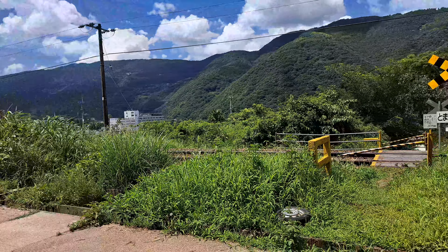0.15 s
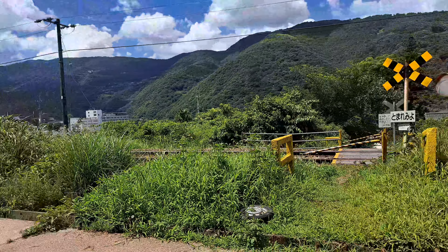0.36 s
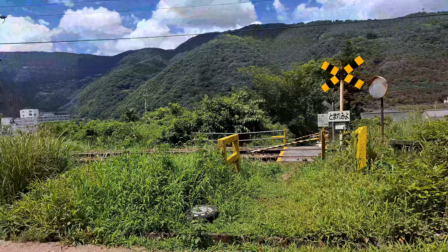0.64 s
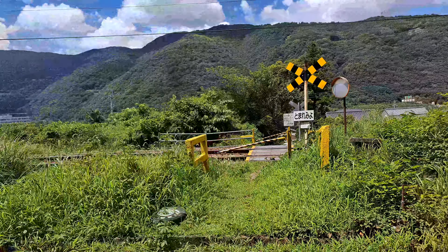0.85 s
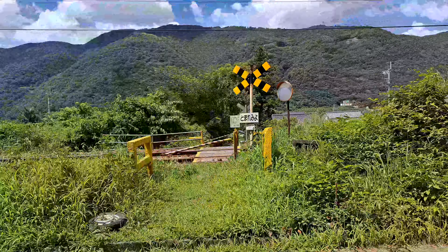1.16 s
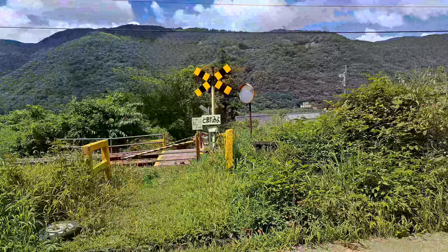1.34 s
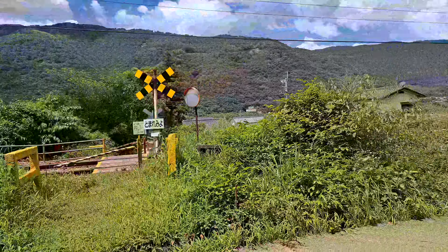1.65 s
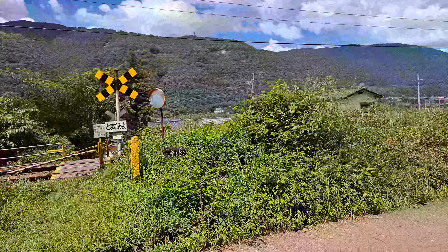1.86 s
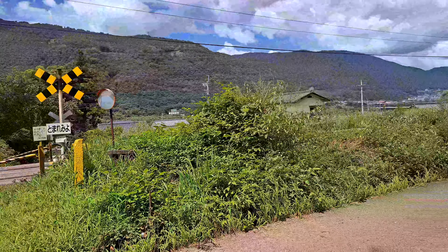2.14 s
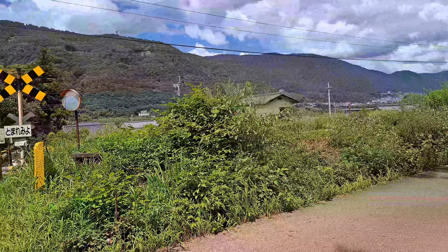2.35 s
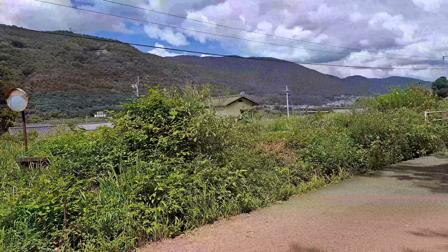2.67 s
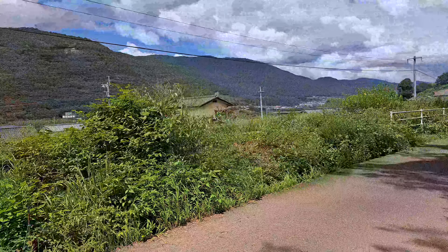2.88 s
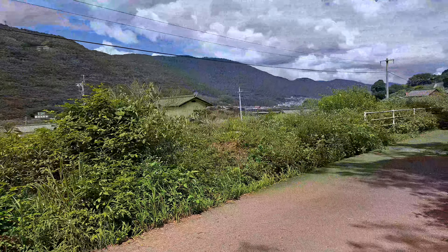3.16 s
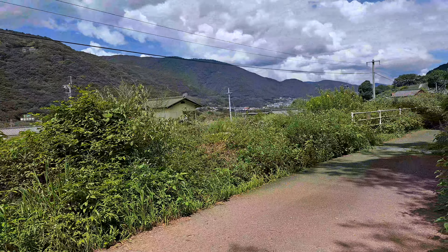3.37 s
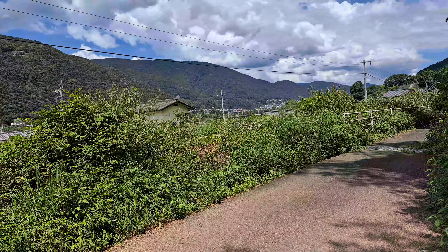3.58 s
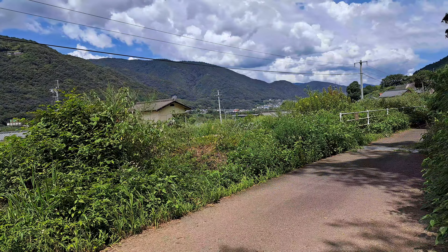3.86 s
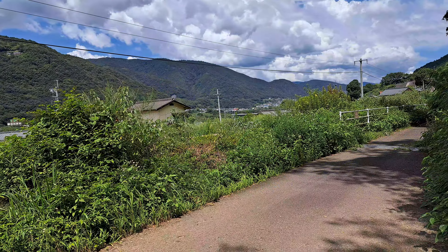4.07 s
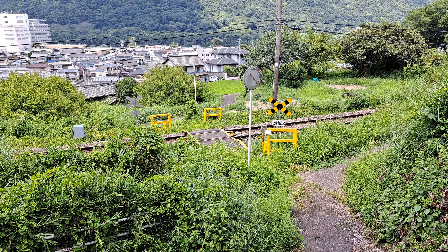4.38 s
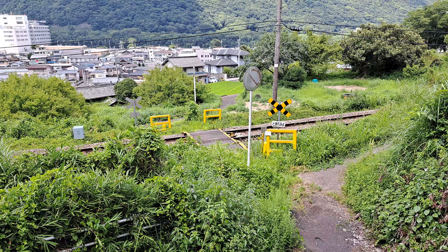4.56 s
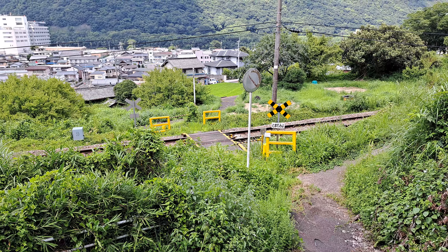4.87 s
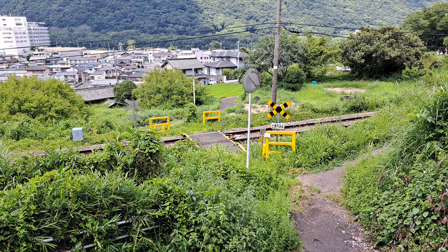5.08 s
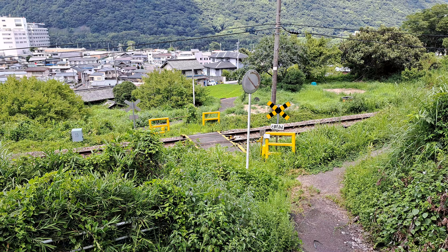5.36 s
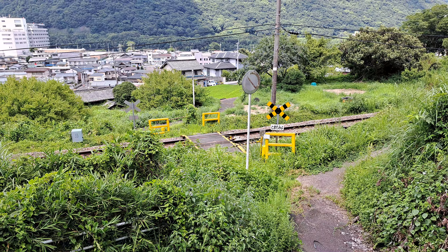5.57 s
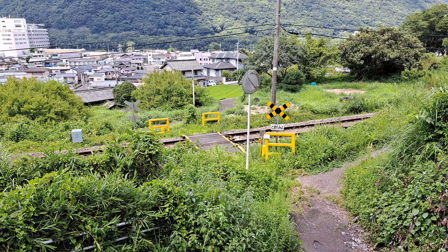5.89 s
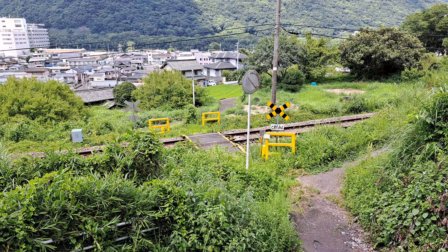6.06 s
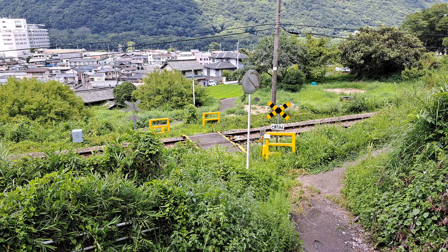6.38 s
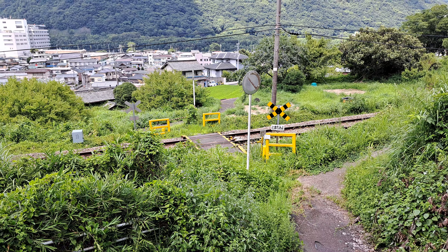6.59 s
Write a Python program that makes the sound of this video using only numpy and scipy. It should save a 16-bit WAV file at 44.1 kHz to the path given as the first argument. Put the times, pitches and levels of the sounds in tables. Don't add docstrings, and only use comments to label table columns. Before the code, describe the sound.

Loud close cicadas shrill on a summer lane with wind thumping the right microphone, then cut to a quieter, farther chorus over low town hum.

```python
import sys
import numpy as np
from scipy import signal
from scipy.fft import rfft, irfft, next_fast_len
from scipy.io import wavfile

SR = 44100
rng = np.random.default_rng(int(sys.argv[2]) if len(sys.argv) > 2 else 0)


def voltage_ratio(decibels):
    exponent = np.asarray(decibels, float) / 20
    return 10 ** exponent


def persist_wave(psi):
    counts = np.round(np.clip(psi, -1, 1) * 32767).astype(np.int16)
    wavfile.write(sys.argv[1], SR, np.atleast_2d(counts).T)


N = 296793
T = np.arange(N) / SR
PADDED = next_fast_len(N)
HZ = np.fft.rfftfreq(PADDED, 1 / SR) + 1e-3
TOP_HZ = 15740
CUT_S, RESUME_S = 4.2023, 4.2355


def rms_one(x):
    return x / np.sqrt(np.mean(x ** 2, axis=-1, keepdims=True) + 1e-20)


def left_right(left_db, right_db):
    return voltage_ratio(np.array([[left_db], [right_db]]))


def in_time(rows):
    s, *columns = np.transpose(rows)
    return [np.interp(T, s, c) for c in columns]


def at_hz(points):
    hz, values = np.transpose(points)
    return np.interp(np.log(HZ), np.log(hz), values)


def shaped(x, gain):
    return irfft(rfft(x, PADDED) * gain, PADDED)[..., :N]


def below(edge_hz, order=6):
    return 1 / np.sqrt(1 + (HZ / edge_hz) ** (2 * order))


def above(edge_hz, order=6):
    return 1 - below(edge_hz, order) ** 2


def drift(rate_hz, count=2):
    steps = next_fast_len(N // 32 + 2)
    hz = np.fft.rfftfreq(steps, 32 / SR)
    slowness = (hz > .2) / (1 + (hz / rate_hz) ** 2)
    slow = rms_one(irfft(rfft(rng.standard_normal((count, steps))) * slowness, steps))
    return np.array([np.interp(np.arange(N) / 32, np.arange(steps), row) for row in slow])


def two_ears(mid_db, pan_db):
    return 2 * voltage_ratio(mid_db) / np.sqrt(1 + voltage_ratio(2 * pan_db * np.array([[-1], [1]])))


def whistle(hz, level_db, width_hz):
    breath = rms_one(shaped(rng.standard_normal((2, N)), below(width_hz, order=2)))
    return voltage_ratio(level_db) * breath * np.sin(2 * np.pi * np.cumsum(hz) / SR)


def tymbals(rate_hz, spread, wander, count=4):
    out = np.zeros((2, N))
    strengths = voltage_ratio(2 * rng.standard_normal(N))
    for own, slow in zip(rng.standard_normal(2 * count), drift(6, count=2 * count)):
        beat = np.cumsum(rate_hz * (1 + spread * own + wander * slow)) / SR
        clicks = np.diff(np.floor(beat), prepend=0)
        out[int(rng.integers(2))] += clicks * np.roll(strengths, int(rng.integers(N)))
    return rms_one(out)


# frequency in Hz, left minus right in dB.
EAR_TILT = [(2400, -5), (4400, -3.5), (5600, -6), (6800, 2), (8000, -1), (8800, 10), (10700, 4),
            (13000, 2.5), (15500, 3)]
SPLITS_HZ = [3500, 6900, 10300]


def chorus(levels, voices, song, near_body, near_shrill, patchy_db):
    level_db, facing_db = in_time(levels)
    mean_db = np.mean(levels, axis=0)[1]
    tilt_db = at_hz(EAR_TILT) / 2 * np.array([[1], [-1]])
    colour = voltage_ratio(at_hz(song) + tilt_db) * above(1100) * below(TOP_HZ)
    low, mid, high = (below(edge, order=12) for edge in SPLITS_HZ)
    bands = [low, mid * np.sqrt(1 - low ** 2), high * np.sqrt(1 - mid ** 2), np.sqrt(1 - high ** 2)]
    nears = [0, near_body * tymbals(395, .03, .01), near_shrill * tymbals(503, .004, .011), 0]
    far = rng.standard_normal((2, N))
    shared_swell = drift(7)
    out = np.zeros((2, N))
    for band, near, (db, swells, pan_db, turns) in zip(bands, nears, voices):
        gain = two_ears(mean_db + db + swells * (level_db - mean_db), pan_db + turns * facing_db)
        patchy = voltage_ratio(patchy_db * (shared_swell + 0.73 * drift(17) + 0.82 * drift(1.1)))
        out += gain * patchy * rms_one(shaped(far + near, colour * band))
    return out


# time in seconds, level in dB, left minus right in dB.
LANE = [(0.05, -19.5, -6.5), (0.2, -19, -6), (1.33, -20, -6.5), (2.0, -21.5, -6), (2.5, -22, -4),
        (3.3, -22, -4.5), (4.15, -21.5, -6)]
# level in dB against the chorus, share of its swell followed,
# left minus right in dB against the chorus, share of its turning followed.
LANE_VOICES = [
    (-32.5, 2.24, -8, .01),
    (-5.5, .9, -2, 1.07),
    (-3, 0.96, 1.8, 1.05),
    (-8.5, 0.84, 0.1, .1),
]
# frequency in Hz, strength in dB per Hz.
LANE_SONG = [(1000, -53), (1700, -43.5), (2010, -31.5), (2680, -21.5), (3140, -32.5), (3810, -31.5),
             (4550, -11), (5580, -1.5), (7040, -8), (7800, -2.5), (8240, 1), (10600, -19.5), (14700, -9.5),
             (15600, -12.5)]


def lane_chorus():
    return chorus(LANE, LANE_VOICES, LANE_SONG, near_body=.8, near_shrill=1.6, patchy_db=.6)


def gusts(rows):
    start, hold, thump_db, flutter_db = np.transpose(rows)[:, :, None]
    s = T[::64]
    rise_db = -600 * np.maximum(start - s, 0)
    fall_db = -335 * np.maximum(s - start - hold, 0)
    shape_db = rise_db + fall_db
    return [2 * np.interp(T, s, voltage_ratio(np.max(db + shape_db, axis=0))) for db in (thump_db, flutter_db)]


# start in seconds, hold in seconds, thump in dB, flutter in dB.
GUSTS = [(-.01, 0.016, -36, -62), (0.298, 0.059, -50, -61), (0.406, 0.041, -41.5, -60),
         (1.047, 0.03, -47.5, -66), (1.287, .06, -31.5, -37.5), (1.345, 0.043, -26, -31.5),
         (1.41, 0.067, -21, -21), (1.5, 0.034, -40, -25), (1.568, 0.067, -40, -45),
         (1.701, .08, -39, -50.5), (1.953, 0.061, -38.5, -45.5), (2.015, 0.041, -33.5, -40),
         (2.147, 0.035, -32, -43), (2.229, 0.017, -25.5, -53), (2.342, 0.038, -33.5, -46),
         (2.382, 0.031, -25, -29.5), (2.447, 0.14, -37.5, -45.5), (2.95, 0.017, -47, -69),
         (3.027, 0.015, -37, -58), (3.11, 0.043, -38, -58), (3.259, 0.017, -39.5, -63),
         (3.54, .06, -53, -62), (3.77, 0.013, -50.5, -66), (3.94, 0.14, -43, -57), (4.174, .03, -62, -58)]
# start in seconds, hold in seconds, thump in dB, flutter in dB.
LEE_GUSTS = [(.08, 0.11, -62, -68), (.28, 0.29, -49, -63), (.52, 0.04, -51, -66), (1.03, .04, -52, -69),
             (1.18, .06, -54, -70), (1.56, .07, -51, -63), (2.0, .05, -67, -72), (2.4, .1, -61, -74),
             (2.9, 0.045, -64, -68), (3.1, 0.17, -59, -68), (3.5, 0.26, -57, -66)]


def wind():
    thumps, flutters = np.swapaxes([gusts(LEE_GUSTS), gusts(GUSTS)], 0, 1)
    breeze = voltage_ratio(-67.5 + 2.5 * drift(2.0))
    eddies = rng.standard_normal((2, 2, N)) * voltage_ratio(4.1 * drift(28))
    thump = rms_one(shaped(eddies[0], below(51.5, order=3) * above(45, order=3)))
    flutter = rms_one(shaped(eddies[1], below(115.5, order=4) * above(95, order=3)))
    blown = (breeze + thumps) * thump + (voltage_ratio(-18) * breeze + flutters) * flutter
    return shaped(blown, below(340, order=4))


# frequency in Hz, left-right likeness from 0 to 1.
LIKENESS = [(60, 1), (130, 0.87), (290, 0.87), (640, .4), (1400, .01)]


def open_air(share):
    mid, side = rng.standard_normal((2, N))
    alike = np.clip(share * at_hz(LIKENESS), 0, 1)
    return shaped(mid, np.sqrt(1 + alike)) + shaped(side, np.sqrt(1 - alike)) * [[1], [-1]]


def patchy_air(noise, spectrum, band, patchy_db):
    return rms_one(shaped(noise, voltage_ratio(at_hz(spectrum)) * band)) * voltage_ratio(patchy_db * drift(13.5, count=1))


# frequency in Hz, strength in dB per Hz.
LANE_AIR = [(18, -31), (30, 5.5), (69, 0.5), (191, -16), (310, -16.5), (735, -20), (804, -21), (1030, -20),
            (1350, -25.5), (1840, -28), (2200, -17.5), (2860, -37), (4840, -120)]


def lane_air():
    band = below(2200) * above(28, order=2) * (1 - .55 * below(125))
    rush = patchy_air(open_air(.4), LANE_AIR, band, patchy_db=1.6)
    return rush * left_right(-59 + 2.2, -59 + 3.2)


# time in seconds, throbs per second, level in dB.
KATYDID = [(0, 16.2, -33), (1.5, 16.4, -35), (2.8, 16.0, -33), (4.19, 16.2, -30), (4.25, 16.5, -45),
           (5.2, 16.8, -43), (5.8, 17.3, -37), (6.73, 17.4, -37)]


def katydid():
    rate, level_db = in_time(KATYDID)
    stroke = np.maximum(np.sin(2 * np.pi * np.cumsum(rate) / SR + 1.2), 0) ** 2
    band = above(13600, order=10) * below(TOP_HZ, order=100)
    rasp = rms_one(shaped(rng.standard_normal((2, N)), band))
    return voltage_ratio(level_db) * stroke * rasp * left_right(-5.5, 1.5)


# time in seconds, pitch in Hz, level in dB.
THIN = [
    (0, 6560, -60),
    (2.5, 6550, -50),
    (2.9, 6540, -38),
    (3.7, 6540, -38),
    (4.19, 6540, -44),
]


def thin_singer():
    return whistle(*in_time(THIN), width_hz=30) * left_right(-9.5, 3.5)


# time in seconds, pitch in Hz, level in dB.
COO = [
    (.74, 1080, -81),
    (.8, 1150, -57),
    (.86, 1100, -60),
    (.93, 1050, -85),
]


def far_coo():
    return whistle(*in_time(COO), width_hz=87) * left_right(-9.5, 3.5)


def lane():
    return lane_chorus() + wind() + lane_air() + thin_singer() + far_coo()


# time in seconds, level in dB, left minus right in dB.
SLOPE = [(4.3, -36, -4.5), (4.7, -36.5, -4), (5.15, -37, -4), (5.5, -33.5, -5.5), (5.92, -31, -4),
         (6.3, -29.5, -4.5), (6.68, -30, -4.5)]
# level in dB against the chorus, share of its swell followed,
# left minus right in dB against the chorus, share of its turning followed.
SLOPE_VOICES = [
    (-25, 0.49, -11.5, .01),
    (-2, 0.79, -4.5, 0.99),
    (-1.5, 0.83, 1, .9),
    (-6.5, 0.7, -2.5, .1),
]
# frequency in Hz, strength in dB per Hz.
SLOPE_SONG = [(1000, -52), (1700, -28), (2510, -20.5), (2730, -20.5), (3230, -26.5), (3640, -28.5),
              (4110, -22), (4680, -9), (5480, -1), (6420, -2), (7310, -0.5), (8170, 1), (10000, -15.5),
              (14800, -6), (15600, -6.5)]


def slope_chorus():
    return chorus(SLOPE, SLOPE_VOICES, SLOPE_SONG, near_body=.75, near_shrill=.6, patchy_db=.4)


# frequency in Hz, strength in dB per Hz.
TOWN_HUM = [(12, -39), (20, -2), (41, -5.5), (60, 2), (152, -17.5), (251, -11.5), (999, -22), (1210, -24.5),
            (1380, -22.5), (2420, -27.5), (2760, -59), (3210, -34), (3500, -30), (4550, -60), (7700, -120)]


def town_hum():
    swell_db = in_time(SLOPE)[0] - np.mean(SLOPE, axis=0)[1]
    noise = open_air(0.96)
    rumble_band = below(154) * above(17, order=2)
    traffic_band = below(2230) * np.sqrt(above(168))
    rumble = voltage_ratio(-43.5 + 0.59 * swell_db + 2 * drift(2.6, count=1))
    rumble = rumble * patchy_air(noise, TOWN_HUM, rumble_band, patchy_db=0.87)
    traffic = voltage_ratio(-48.5 + 0.89 * swell_db) * left_right(.4, 1.6)
    traffic = traffic * patchy_air(noise, TOWN_HUM, traffic_band, patchy_db=0.87)
    return rumble + traffic


# seconds after the phrase starts, pitch in Hz, level in dB.
PHRASE = [
    [(.005, 2200, 10), (.017, 2560, 5), (.03, 3060, 8.5)],
    [(.06, 3550, -4), (.13, 3710, 2), (.22, 3530, -2)],
    [(.18, 1380, -9), (.23, 1378, -6.5), (.32, 1416, -3)],
    [(.18, 2830, -16), (.23, 2760, 1), (.32, 2740, -10)],
    [(.37, 2250, -1), (.4, 2326, -3), (.43, 2356, -8)],
]
NOTE_WIDTHS_HZ = [120, 90, 30, 25, 200]
# start in seconds, level in dB.
PHRASES = [
    (4.265, -50),
    (5.07, -51),
    (5.886, -47),
]


def distant_phrase():
    starts = np.array(PHRASES)[:, 0]
    since = T - starts[np.maximum(np.searchsorted(starts, T) - 1, 0)]
    phrase_db = in_time(PHRASES)[0]
    out = np.zeros((2, N))
    for note, width_hz in zip(PHRASE, NOTE_WIDTHS_HZ):
        s, hz, note_db = np.transpose(note)
        level_db = np.interp(since, s, note_db, left=-99, right=-99) + phrase_db
        out += whistle(np.interp(since, s, hz), level_db, width_hz) * left_right(-4.5, 1.5)
    return out + .3 * np.roll(out, round(.021 * SR), axis=1)


# middle in seconds, pitch in Hz, length in seconds, level in dB.
CHIPS = [(4.41, 3030, .03, -56), (4.628, 2700, .02, -57), (5.02, 2230, .03, -48), (5.48, 2260, .025, -48),
         (5.73, 2600, .02, -50), (5.76, 2720, .04, -51.5), (5.811, 2250, .05, -54),
         (6.239, 2800, .12, -48.5), (6.325, 2850, .03, -46)]


def chips():
    middles = np.array(CHIPS)[:, 0]
    nearest = np.argmin(abs(T[::64, None] - middles), axis=1).repeat(64)[:N]
    s, hz, length, chip_db = np.array(CHIPS)[nearest].T
    level_db = np.maximum(chip_db - 24 * ((T - s) / length) ** 2, -99)
    return whistle(hz, level_db, width_hz=82) * left_right(-5.5, 1.5)


def slope():
    return slope_chorus() + town_hum() + distant_phrase() + chips()


def scene():
    on_lane = T < (CUT_S + RESUME_S) / 2
    return np.where(on_lane, lane(), slope()) + katydid()


def roll_off(x):
    return signal.sosfilt(signal.butter(12, 15780, fs=SR, output="sos"), x)


# frequency in Hz, gain in dB.
LEFT_PORT = [(700, -0.5), (1150, -2), (1600, -13), (1950, -25), (2250, -3), (2950, 1), (3250, -15),
             (3550, -20), (3800, -2), (4500, 0.5)]


def record(dry):
    ports = voltage_ratio(at_hz(LEFT_PORT) * np.array([[1], [0]])) * below(TOP_HZ, order=400)
    heard = shaped(dry, ports)
    heard = heard / (1 + (heard / 1.05) ** 8) ** .125
    splice = (T < CUT_S) + np.clip((T - RESUME_S) / 0.00099, 0, 1)
    return roll_off(heard * splice)


dry = scene()
out = record(dry)
persist_wave(out)
```